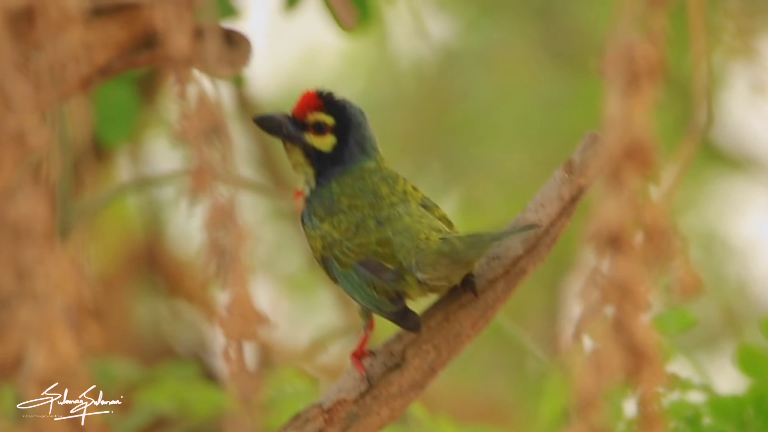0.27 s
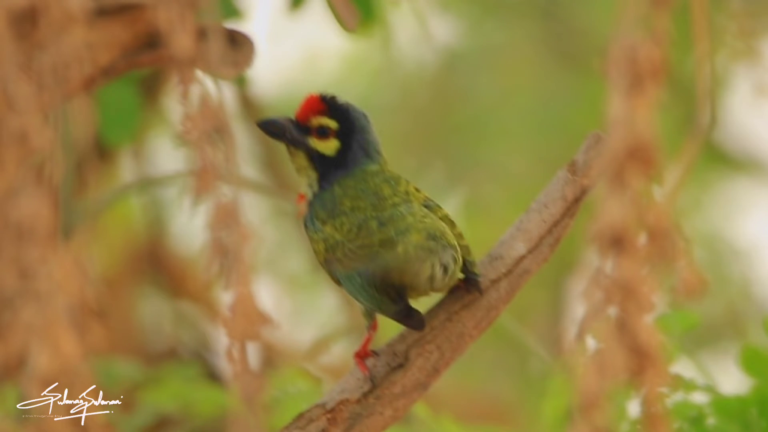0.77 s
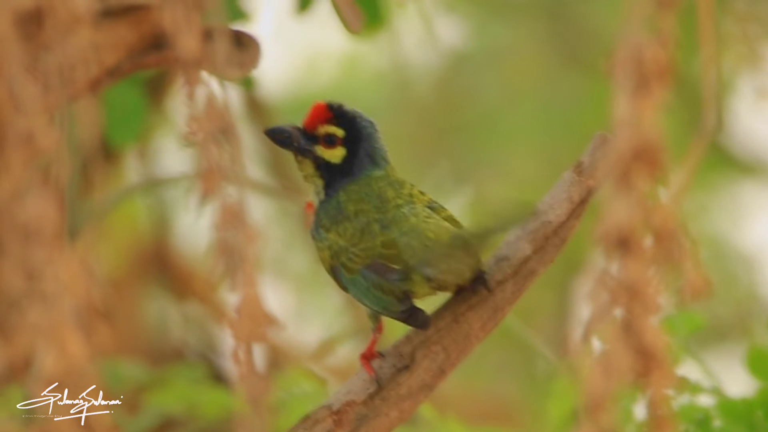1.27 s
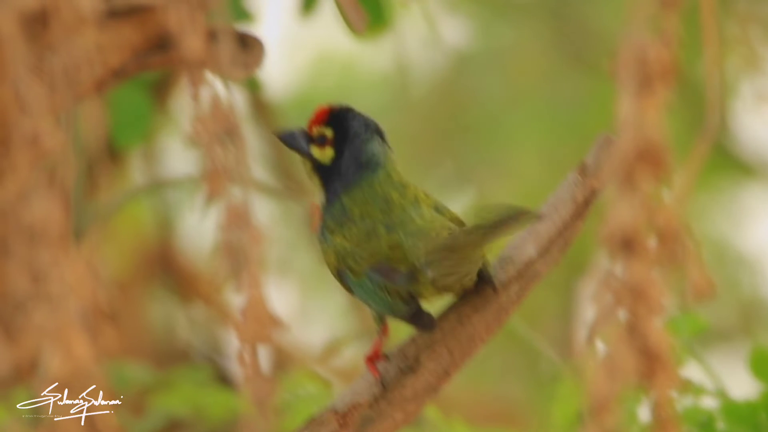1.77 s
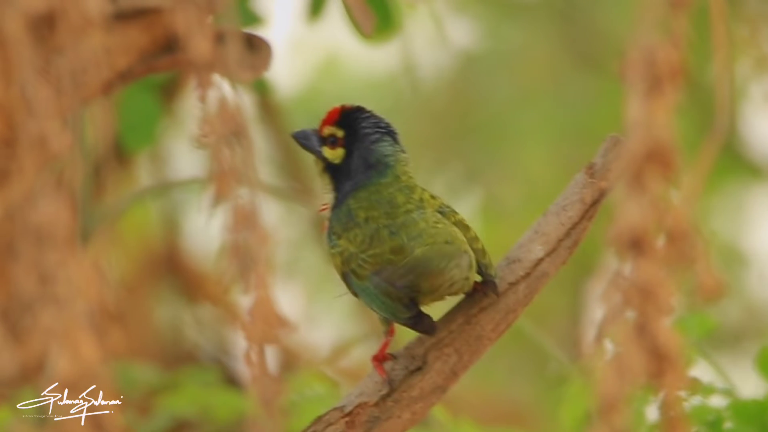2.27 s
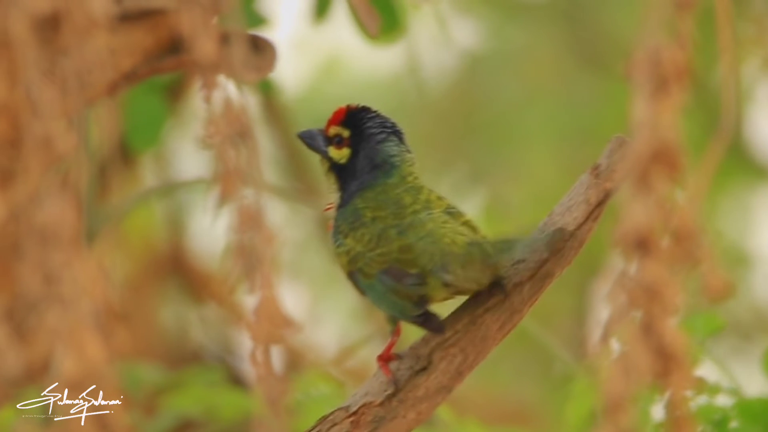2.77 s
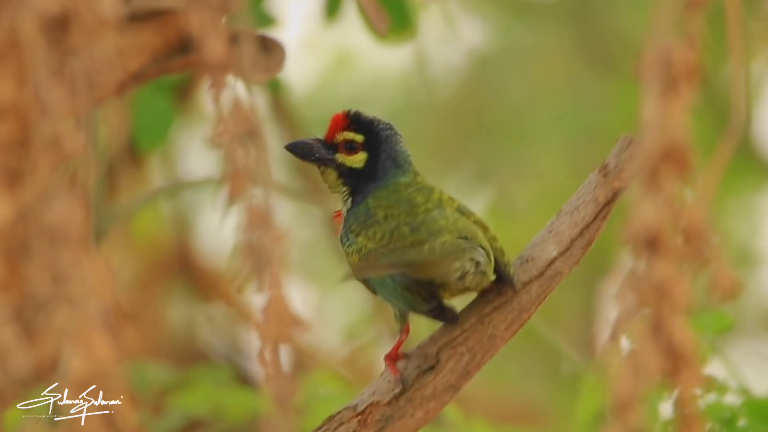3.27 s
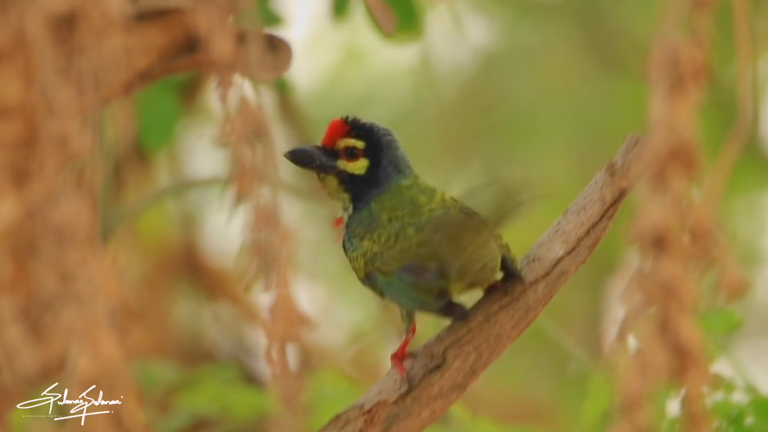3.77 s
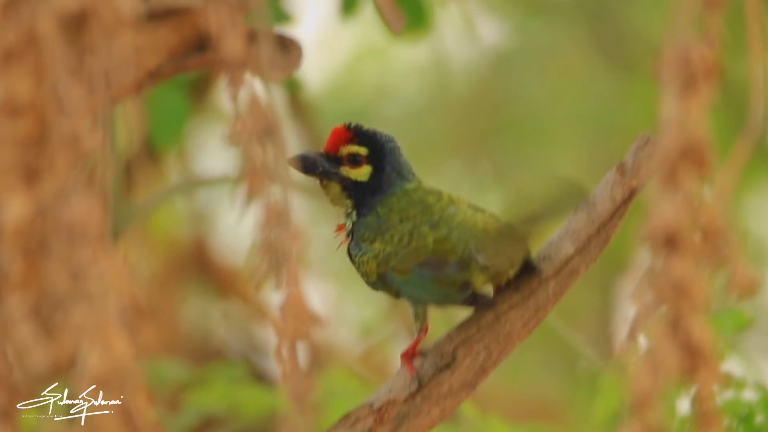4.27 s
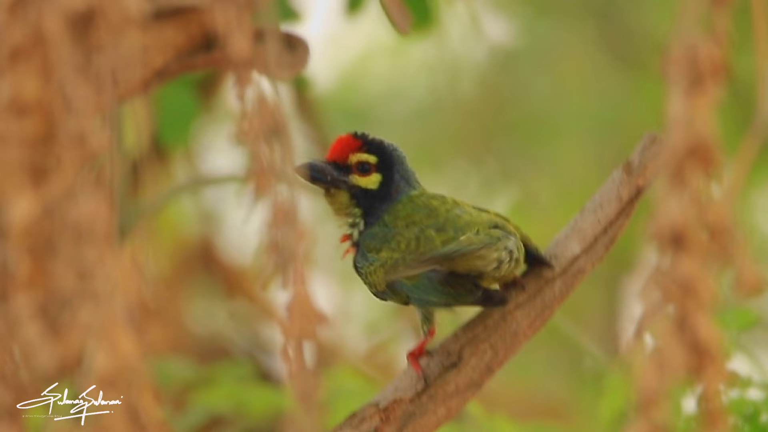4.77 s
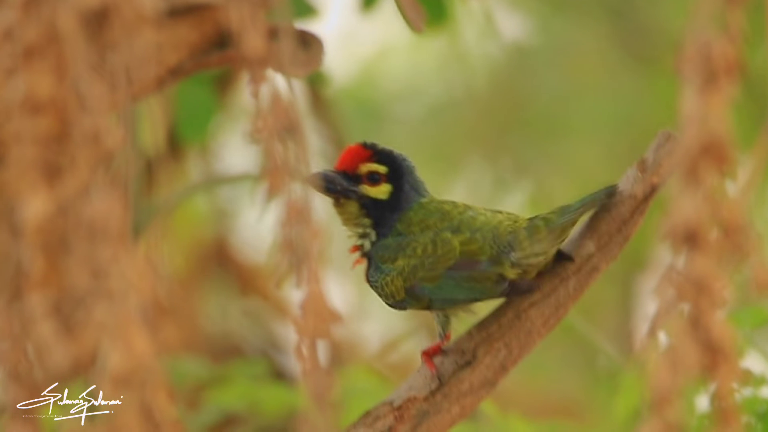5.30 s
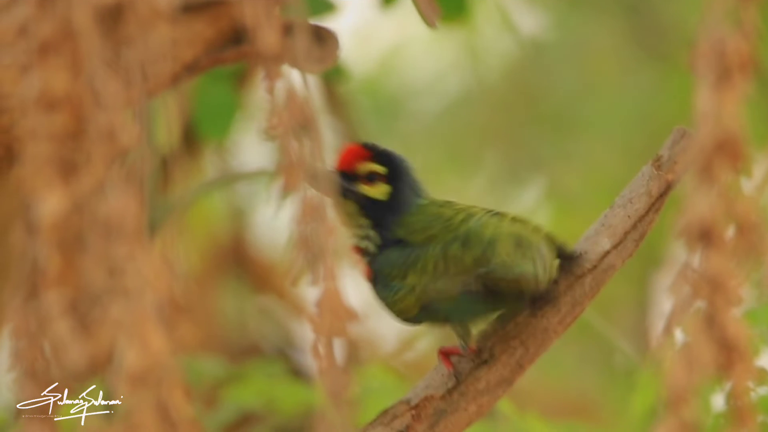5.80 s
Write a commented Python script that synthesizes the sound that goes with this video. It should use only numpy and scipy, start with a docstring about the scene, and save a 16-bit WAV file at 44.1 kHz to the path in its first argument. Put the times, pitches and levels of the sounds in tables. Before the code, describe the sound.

A bird repeats a low, hollow tuk about twice a second, softly echoing among trees, while small birds chirp and whistle over faint leaf hush.

```python
"""First come the last echoes of a hollow "tuk", a few chirps and one sharp "chip". Then a coppersmith barbet on
a branch repeats its tuk, a nearly pure swelling sine, and the trunks around throw each note back.
Higher notes overlap the last one. Small birds chirp and whistle in short gliding tones, and one gives a rattling
squawk: pulses that ring its throat. Behind them lie a faint far rumble and the hush of leaves, made of filtered noise."""
import sys
import numpy as np
from scipy import signal
from scipy.io import wavfile

SR = 44100
rng = np.random.default_rng(int(sys.argv[2]) if len(sys.argv) > 2 else 0)


def output_pcm(signal):
    """Save a mono or channel-first signal as 16-bit PCM at the path in sys.argv[1].

    Samples are clipped to [-1, 1] before scaling.
    """
    pcm = np.clip(np.atleast_2d(signal).T, -1, 1) * 32767
    wavfile.write(sys.argv[1], SR, np.round(pcm).astype(np.int16))


N = 266452  # length in samples


def from_db(db):
    """Turn decibels into a gain."""
    return 10 ** (np.asarray(db) / 20)


def rms_one(x):
    """Scale a sound to rms 1."""
    return x / np.sqrt(np.mean(x ** 2) + 1e-20)


def at_hz(points, hz):
    """Read a curve at a frequency, with straight lines between points on a log-frequency axis."""
    table_hz, values = np.array(points).T
    return np.interp(np.log(hz), np.log(table_hz), values)


def add(out, s, sound):
    """Mix a sound in from time s on, dropping whatever falls outside the scene."""
    start = round(s * SR)
    part = sound[..., max(-start, 0):max(N - start, 0)]
    first = max(start, 0)
    out[..., first:first + part.shape[-1]] += part


def phase_of(hz):
    """Add up a changing pitch into the running phase of a tone."""
    return 2 * np.pi * np.cumsum(hz) / SR


def band(x, low_hz, high_hz, order=2):
    """Keep only the frequencies between two limits (Butterworth band-pass)."""
    return signal.sosfilt(signal.butter(order, [low_hz, high_hz], "band", fs=SR, output="sos"), x)


def drift(rate, count=N):
    """Random wander around 0 with spread about 1, heading for a new value `rate` times a second."""
    knots = rng.standard_normal(1024)
    return np.interp(np.arange(count) / SR * rate, np.arange(len(knots)), knots)


def among_trees(sound, pan_db, scatter_db, t60=0.26, spread=0.08, build_s=0.011):
    """A call arrives directly and, scattered by leaves and twigs, as a tail that builds and dies."""
    t = np.arange(SR // 2) / SR
    tail_level = from_db(-60 * t / t60) * (1 - np.exp(-t / build_s))
    mid, side = rng.standard_normal((2, len(t))) * tail_level
    paths = mid + spread * side * [[1], [-1]]
    paths *= from_db(scatter_db) / np.sqrt(np.sum(paths ** 2) / 2)
    paths[:, 0] += 1  # the direct sound
    return signal.fftconvolve(sound[None], paths, axes=1) * from_db([[pan_db / 2], [-pan_db / 2]])


# how softly the throat closes, and how rounded the start of the ring-down is
THROAT_CLOSE_S, CREST_S = .0035, .009


def tuk(hz, sag, rise, fade_db, length, sag_s=0.0055):
    """The throat sac swells into a sine, sags in pitch and rings down by fade_db a second, then closes."""
    t = np.arange(SR // 6) / SR - 3 * rise  # t = 0 at the crest
    swell = np.exp(-(np.minimum(t, 0) / rise) ** 2)
    ring_down = from_db(-fade_db * (np.hypot(np.maximum(t, 0), CREST_S) - CREST_S))
    closing = 1 / (1 + np.exp((t - length) / THROAT_CLOSE_S))
    pitch = hz * (1 - sag * np.maximum(np.tanh(t / sag_s), -.5))
    return swell * ring_down * closing * np.sin(phase_of(pitch))


# a last echo from far trees: its delay and width
FAR_ECHO_S, FAR_ECHO_WIDTH_S = 0.279, 0.024
# countless small echoes merge and linger: when they start, how fast they build and die
LINGER_START_S, LINGER_BUILD_S, LINGER_T60_S = 0.052, 0.0073, 0.39
# echoes from groups of trees: (delay t/s, width t/s, level/dB on top of each note's own tree echo level)
TREE_GROUPS = [(0.12, 0.018, 1.5), (0.161, 0.018, -6.5)]


def echo_tail(hz, echo_db, linger_db, far_db, waver=0.016, flutter_db=3.6, width_db=1.5):
    """Echoes of a note merge into a lingering tone that wavers and swells as each group of trees answers."""
    t = np.arange(SR // 2) / SR
    swells = [(s, width, db + echo_db) for s, width, db in TREE_GROUPS]
    swells.append((FAR_ECHO_S, FAR_ECHO_WIDTH_S, far_db))
    power = sum((from_db(db) * np.exp(-((t - s) / width) ** 2)) ** 2 for s, width, db in swells)

    since = np.maximum(t - LINGER_START_S, 0)
    build = 1 - np.exp(-(since / LINGER_BUILD_S) ** 2)
    linger = build * from_db(linger_db - 60 * (since - LINGER_BUILD_S) / LINGER_T60_S)

    shared_flutter = flutter_db * drift(60, count=len(t))
    left_right_flutter = width_db * drift(30, count=len(t)) * [[1], [-1]]
    flutter = from_db(shared_flutter + left_right_flutter)
    tone = np.sin(phase_of(hz * (1 + waver * drift(80, count=len(t)))))
    return np.sqrt(power + linger ** 2) * flutter * tone


ECHO_PITCH = .967  # echoes sound a little lower than the note
# the nearest trunk: delay and rise of its reflection, and its fade over trunk_length
TRUNK_S, TRUNK_RISE_S, TRUNK_FADE_DB = .05, 0.012, 23.5
# barbet notes: (crest t/s, pitch f/Hz, pitch sag as a share, level/dB, rise t/s, length t/s,
#                fade over that length level/dB, then against the note: trunk reflection level/dB,
#                tree echoes level/dB, lingering tail level/dB, far echo level/dB)
BARBET_NOTES = [(-0.11, 728, 0.026, -14, .009, 0.032, 7, -15, -29, -31, -38),
                (0.4792, 726, 0.013, -13.5, 0.01, 0.046, 9.5, -9.5, -36.5, -30, -32),
                (1.0399, 726, 0.012, -12.5, .009, 0.044, 13, -14.5, -46.5, -34, -38),
                (1.5983, 727.7, 0.016, -11.5, 0.01, 0.049, 22.5, -12, -25, -37, -40),
                (2.1643, 727, 0.033, -19, 0.0085, 0.031, 10.5, -9.5, -10, -19, -29),
                (2.747, 723, 0.042, -15, 0.01, 0.039, 20, -9.5, -15.5, -14.5, -37),
                (3.3244, 724, 0.025, -13, .009, 0.03, 14.5, -10.5, -15, -16, -36),
                (3.895, 726.2, 0.026, -14.5, .009, 0.032, 13.5, -10, -17, -21.5, -29),
                (4.443, 723, 0.038, -12, .008, 0.04, 23, -14, -18, -21.5, -39),
                (5.005, 710.7, 0.012, -15, 0.0095, 0.011, -2, -19, -28, -22.5, -38.5),
                (5.03, 699.6, 0.007, -25, .008, 0.011, 3, -17, -12.5, -16.5, -32),
                (5.5848, 719.3, 0.0079, -7.5, 0.0099, 0.029, 18, -6.5, -30, -26, -42),
                (5.603, 857.3, 0.026, -16.5, .008, 0.0081, 7.5, -9, -50, -24, -43),
                (5.617, 791.4, 0.021, -6.5, .009, 0.011, 11.5, -19, -46.5, -36, -55)]


def barbet(trunk_length=0.0057, scatter_db=-29):
    """Each tuk is followed by a reflection from the nearest trunk and a tail of far echoes."""
    out = np.zeros((2, N))
    trunk_fade = TRUNK_FADE_DB / trunk_length  # dB per second
    for s, hz, sag, db, rise, length, fade_db, trunk_db, echo_db, linger_db, far_db in BARBET_NOTES:
        note = from_db(db) * tuk(hz, sag, rise, fade_db / length, length)
        # a tuk begins three rises before its crest
        add(out, s - 3 * rise, among_trees(note, .1, scatter_db, t60=0.61, spread=0.56))

        echo_hz = hz * ECHO_PITCH
        reflection = tuk(echo_hz, sag / 2, TRUNK_RISE_S, trunk_fade, trunk_length)
        add(out, s - 3 * TRUNK_RISE_S + TRUNK_S, from_db(db + trunk_db) * reflection)
        add(out, s, from_db(db) * echo_tail(echo_hz, echo_db, linger_db, far_db))
    return out


def harsh_call(pulses, throat, opening_s, pan_db, scatter_db, bounce_s, bounce_db, rough=0.015):
    """Pulses of the syrinx (voice box) each ring the throat's resonances; a trunk throws the call back once."""
    out = np.zeros(N)
    t = np.arange(SR // 4) / SR
    opening = 1 - np.exp(-(t / opening_s) ** 2)
    for s, db in pulses:
        for hz, width, mode_db in throat:
            rough_hz = hz * (1 + rough * drift(970, count=len(t)))
            # a wider resonance dies sooner
            ring = opening * np.exp(-np.pi * width * t) * np.sin(phase_of(rough_hz))
            add(out, s, from_db(db + mode_db) * ring)
            add(out, s + bounce_s, from_db(db + mode_db + bounce_db) * ring)
    return among_trees(out, pan_db, scatter_db, t60=0.24)[:, :N]


# the run of pulses: start, spacing, unevenness as a share of the spacing
SQUAWK_S, SQUAWK_PERIOD_S, SQUAWK_JITTER = 3.1715, 0.009, 0.1
# level the pulses swell to, and how far under it the run starts
SQUAWK_DB, SQUAWK_SWELL_DB = -15.5, 15.5


def squawk_pulses(count=6, swell_pulses=0.68):
    """Slightly uneven pulses swell to full strength: rows of (t/s, level/dB)."""
    k = np.arange(count)
    s = SQUAWK_S + SQUAWK_PERIOD_S * (k + SQUAWK_JITTER * rng.standard_normal(count))
    return zip(s, SQUAWK_DB - SQUAWK_SWELL_DB * np.exp(-k / swell_pulses))


# throat resonances of the squawking bird: (f/Hz, width f/Hz, level/dB)
SQUAWK_RESONANCES = [(292.4, 8.1, -35.5), (1336, 83, 3), (1410, 110, -11), (1624, 73, -9),
                     (2302, 18, -24.5), (4160, 100, -14.5), (4990, 146, -7.5), (5160, 143, -22.5),
                     (6180, 37, -37.5), (6380, 60, -40), (8870, 140, -50)]


def squawk():
    """A short rattle: quick pulses, each ringing the throat."""
    return harsh_call(squawk_pulses(), SQUAWK_RESONANCES, opening_s=0.0032, pan_db=-13.0,
                      scatter_db=-12, bounce_s=0.037, bounce_db=-16.5)


# the two pulses of one sharp "chip", a soft one and a hard one: (t/s, level/dB)
CHIP_PULSES = [(0.092, -33), (0.1112, -11.5)]
# throat resonances of the chip: (f/Hz, width f/Hz, level/dB)
CHIP_RESONANCES = [(2560, 72, -3.5), (3575, 103, -2), (4400, 190, -25), (5280, 147, -8), (5690, 170, -9.5),
                   (6640, 120, -23.5), (7050, 150, -16.5), (7650, 150, -25), (9100, 32, -53)]


def chip():
    """A soft pulse and then a hard one ring the throat of a small bird."""
    return harsh_call(CHIP_PULSES, CHIP_RESONANCES, opening_s=0.0021, pan_db=-5.5,
                      scatter_db=-17, bounce_s=.04, bounce_db=-27)


CHIRP_OVERTONE_DB = -44.5


def chirp(length, start_hz, end_hz, waver, flutter_db=3):
    """One gliding note, clear or husky (more waver), flutters in strength and has a weak overtone."""
    u = np.linspace(0, 1, int(length * SR))  # 0 to 1 through the note
    glide = start_hz + (end_hz - start_hz) * u
    phase = phase_of(glide * (1 + waver * drift(900, count=len(u))))
    envelope = np.sin(np.pi * u) ** 2 * from_db(flutter_db * drift(220, count=len(u)))
    return envelope * (np.sin(phase) + from_db(CHIRP_OVERTONE_DB) * np.sin(2 * phase))


# where the small birds sit, by name:
# (left minus right level/dB, scatter by the leaves level/dB, pitch waver of the voice as a share)
BIRD_PERCHES = {"ahead": (3.7, -3, 0.017), "left": (15.2, 0, 0.017), "near right": (-8.5, -10, 0.0077),
                "far": (-9, 3.1, .015), "close": (0.97, -7, 0.0071), "overhead": (2.5, -9, .006)}
# small birds' chirps: (start t/s, length t/s, start f/Hz, end f/Hz, level/dB, perch name)
CHIRP_NOTES = [(0.076, 0.052, 2580, 2520, -40, "near right"), (0.099, 0.038, 2017, 1899, -40, "left"),
               (0.259, 0.057, 5930, 5740, -48.5, "near right"), (0.304, 0.019, 3580, 3190, -47.5, "ahead"),
               (0.343, 0.032, 8420, 8900, -63, "close"), (0.359, 0.012, 7300, 7300, -52, "close"),
               (0.36, 0.014, 10500, 10500, -69, "close"), (0.464, 0.054, 3465, 3292, -26.5, "close"),
               (0.496, 0.055, 2870, 2332, -43, "left"), (0.5, 0.11, 3397, 3462, -42.5, "near right"),
               (0.521, 0.025, 6070, 6190, -45.5, "near right"),
               (0.609, 0.024, 3540, 3346, -40.5, "near right"), (0.706, 0.066, 3467, 3230, -43, "ahead"),
               (0.741, 0.043, 2576, 2298, -45.5, "left"), (0.942, 0.07, 2256, 2035, -50, "left"),
               (0.981, 0.021, 8950, 9000, -69.5, "near right"),
               (0.984, 0.014, 3060, 3100, -48, "near right"), (1.039, 0.068, 3665, 3126, -44, "ahead"),
               (1.08, 0.013, 5470, 5550, -45, "near right"), (1.148, 0.075, 2606, 2590, -44.5, "ahead"),
               (1.169, 0.044, 3244, 3196, -41, "ahead"), (1.203, 0.12, 2916, 2905, -43, "left"),
               (1.241, 0.14, 2835, 2823, -36.5, "overhead"), (1.244, 0.14, 2750, 2823, -43, "overhead"),
               (1.468, 0.031, 3150, 3434, -52, "left"), (1.696, 0.018, 4440, 4020, -59, "far"),
               (1.75, 0.12, 2217, 2263, -44, "left"), (1.865, 0.038, 2990, 2903, -42.5, "left"),
               (2.102, 0.012, 8900, 8860, -80, "near right"), (4.32, 0.024, 2610, 2610, -53.5, "far"),
               (4.614, 0.19, 3237, 3350, -59.5, "far"), (4.849, 0.32, 3345, 3420, -67.5, "far")]


def chirps():
    """Small birds sing short gliding notes, each heard from its own perch."""
    out = np.zeros((2, N))
    for s, length, start_hz, end_hz, db, perch in CHIRP_NOTES:
        pan_db, scatter_db, waver = BIRD_PERCHES[perch]
        note = from_db(db) * chirp(length, start_hz, end_hz, waver)
        add(out, s, among_trees(note, pan_db, scatter_db))
    return out


# thin slurred whistles: (start t/s, length t/s, top f/Hz, bottom f/Hz, level/dB,
#                         left minus right level/dB, scatter level/dB)
WHISTLE_NOTES = [(4.097, 0.11, 6640, 5930, -42.5, -8, -10.5), (4.406, 0.09, 6730, 6010, -37.5, -3.5, -0.5),
                 (4.617, 0.09, 6675, 6020, -37.5, 0, 1.5), (4.955, 0.041, 6390, 5880, -43.5, -5, -0.5)]


def whistles(turn=0.18, flick=0.053, slur=0.29, waver=0.004, flutter_db=2.5,
             upper_hz=3950, upper_db=-36, highest_db=-50):
    """A quick flick up, then a fluttering slur down that levels out; two faint higher lines glide along."""
    out = np.zeros((2, N))
    for s, length, top_hz, bottom_hz, db, pan_db, scatter_db in WHISTLE_NOTES:
        u = np.linspace(0, 1, int(length * SR))  # 0 to 1 through the whistle
        hz = bottom_hz + (top_hz - bottom_hz) * np.exp(-((u - turn) / slur) ** 2)
        hz *= 1 - flick * np.maximum(1 - u / turn, 0) + waver * drift(900, count=len(u))
        tone = 0
        for k, line_db in enumerate([0, upper_db, highest_db]):
            tone = tone + from_db(line_db) * np.sin(phase_of(hz + k * upper_hz))
        envelope = np.sin(np.pi * u) * from_db(db + flutter_db * drift(230, count=len(u)))
        add(out, s, among_trees(envelope * tone, pan_db, scatter_db, t60=0.39, spread=0.74))
    return out


FAR_CALL_S, FAR_CALL_WAVER = .17, .04  # length, and pitch waver as a share
# thin calls of distant birds: (start t/s, start f/Hz, level/dB)
DISTANT_CALLS = [(0.87, 5410, -76.5), (1.52, 5320, -75.5), (1.679, 4700, -74.5), (1.97, 5300, -76),
                 (2.62, 5320, -70), (3.25, 5320, -72), (3.49, 4830, -72.5), (3.851, 5320, -76),
                 (4.779, 5320, -76), (5.46, 5340, -73.5), (5.62, 6620, -72.5)]


def twitter(fall=0.023, scatter_db=4):
    """Distant birds give thin husky calls that arrive mostly scattered."""
    out = np.zeros((2, N))
    for s, hz, db in DISTANT_CALLS:
        note = from_db(db) * chirp(FAR_CALL_S, hz, hz * (1 - fall), FAR_CALL_WAVER)
        add(out, s, among_trees(note, 0, scatter_db, spread=0.78))
    return out


TICK_HZ = 6160  # middle of the ticks' band
# dry little ticks of bills and twigs: (t/s, level/dB, left minus right level/dB)
BILL_AND_TWIG_TICKS = [(0.113, -63, 16), (0.367, -61.5, 13), (0.533, -68.5, 6), (0.619, -73, 10),
                       (0.992, -74, 5.5), (1.087, -72.5, 12.5), (2.110, -68, -3), (4.223, -69, 2)]


def ticks(decay_s=0.0036):
    """Bills and twigs make tiny bright snaps of noise, each about an octave wide."""
    out = np.zeros((2, N))
    t = np.arange(SR // 40) / SR
    for s, db, pan_db in BILL_AND_TWIG_TICKS:
        noise = rng.standard_normal(len(t))
        snap = rms_one(band(noise, TICK_HZ / np.sqrt(2), TICK_HZ * np.sqrt(2), order=3))
        envelope = t / decay_s * np.exp(1 - t / decay_s)  # crest at decay_s
        add(out, s - decay_s, among_trees(from_db(db) * snap * envelope, pan_db, -13, t60=0.14))
    return out


AIR_DB = -52.5  # rms level of the hush
RUMBLE_HZ, RUMBLE_DB = 76.4, -75
LOW_SWELL_TOP_HZ = 405  # the low swell weakens above this
# tone colour of the leaf hush: (f/Hz, relative level/dB per Hz)
HUSH_SPECTRUM = [(22, -22), (45, -11), (90, -8), (150, -14), (225, -12), (295, 1), (440, -2.5),
                 (1250, -2.5), (1800, -10), (3300, -15.5), (3900, -26), (5300, -30), (6500, -26.5),
                 (7300, -35), (8500, -44.5), (14000, -51.5)]
# how alike the hush is on left and right: (f/Hz, likeness from 0 to 1)
LEFT_RIGHT_LIKENESS = [(60, 1), (230, 0.91), (900, 0.91), (1800, 0.74), (3600, 0.76), (7000, 0.037)]
# how the low part of the hush rises and falls: (t/s, level/dB)
LOW_HUSH_SWELL = [(0, 1), (0.901, 2), (1.799, -1), (3, -3), (4.7, 0), (5.248, 1), (5.801, 3.5)]


def air(patchy_db=3.5, patch_rate=7, steady_hz=5000):
    """Leaf hush in narrow noise bands that waver, steadier and wider in the treble, over a far rumble."""
    out = 0
    edges = np.geomspace(22, 15000, 41)
    white = rng.standard_normal((2, 2, N))
    swell_db = np.interp(np.arange(N) / SR, *np.transpose(LOW_HUSH_SWELL))
    for k, (low, high) in enumerate(zip(edges, edges[1:])):
        mid, side = band(white[k % 2], low, high, order=3)  # neighbouring bands use different noise
        hz = np.sqrt(low * high)
        alike = np.clip(at_hz(LEFT_RIGHT_LIKENESS, hz), 0, 1)
        waver_db = patchy_db * drift(patch_rate) / (1 + hz / steady_hz)
        low_db = swell_db / (1 + (hz / LOW_SWELL_TOP_HZ) ** 2)
        gain = from_db(at_hz(HUSH_SPECTRUM, hz) + waver_db + low_db)
        out = out + gain * (np.sqrt(1 + alike) * mid + np.sqrt(1 - alike) * side * [[1], [-1]])
    rumble = rms_one(band(rng.standard_normal(N), RUMBLE_HZ - 4, RUMBLE_HZ + 4))
    return from_db(AIR_DB) * rms_one(out) + from_db(RUMBLE_DB) * rumble


def scene():
    """The barbet ahead, other birds around it, hush and rumble behind."""
    birds = barbet() + squawk() + chip() + chirps() + whistles() + twitter()
    return birds + ticks() + air()


CUTOFF_HZ = 14500


def record(dry):
    """Cut the top steeply with a low-pass filter."""
    return signal.sosfilt(signal.ellip(8, .1, 70, CUTOFF_HZ, fs=SR, output="sos"), dry)


dry = scene()
out = record(dry)
output_pcm(out)
```